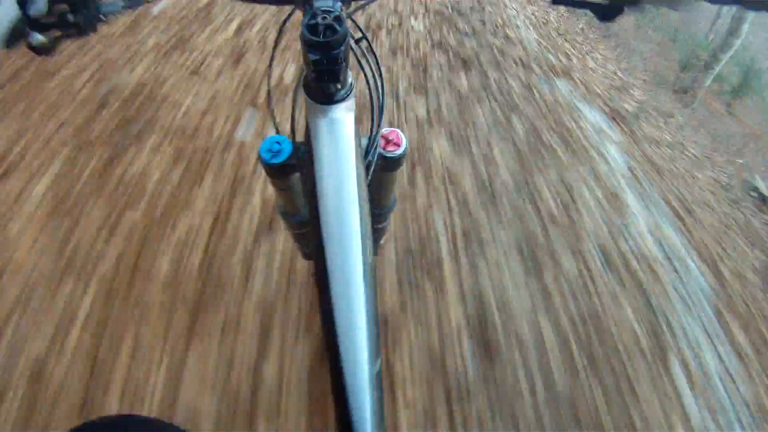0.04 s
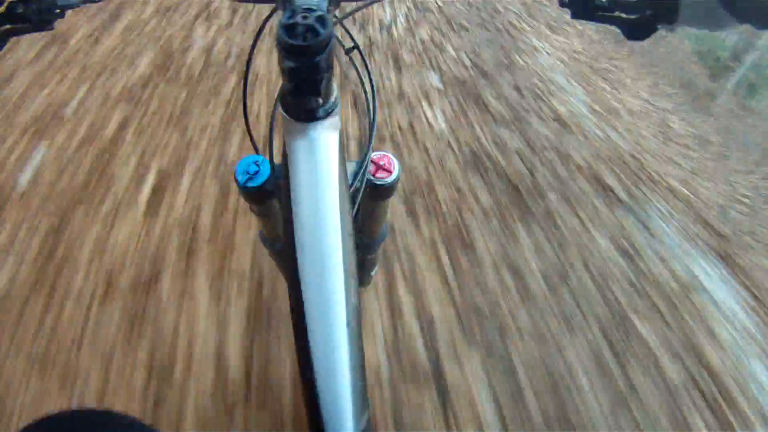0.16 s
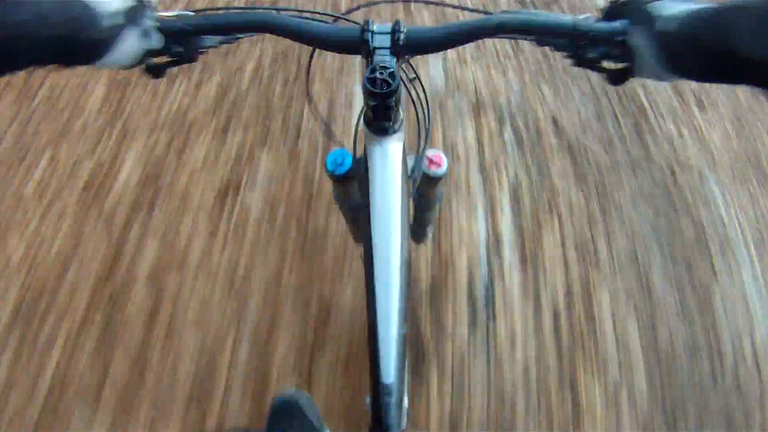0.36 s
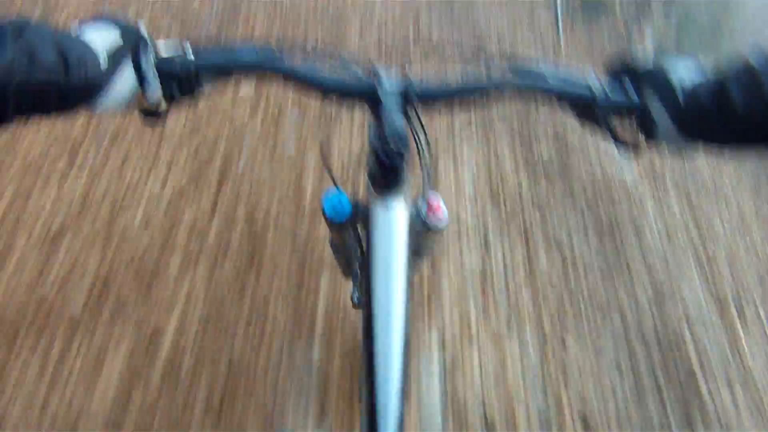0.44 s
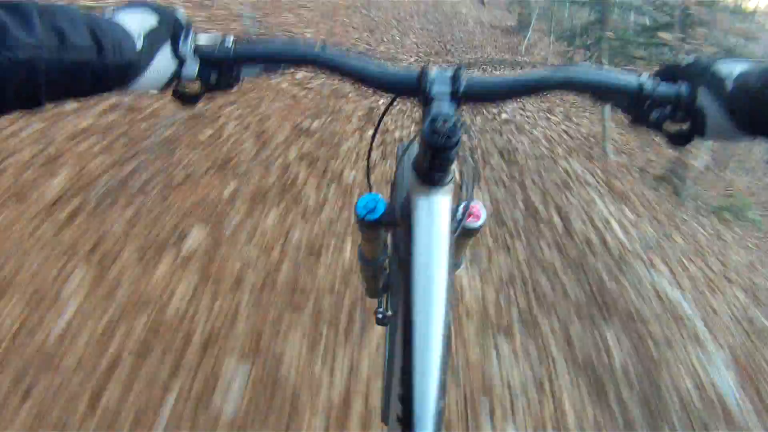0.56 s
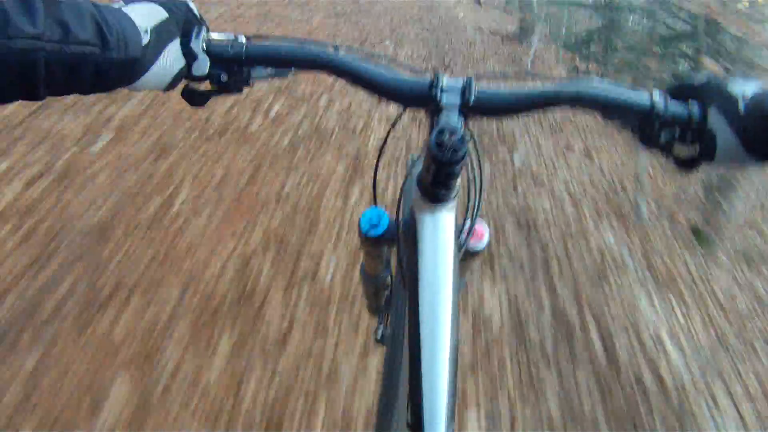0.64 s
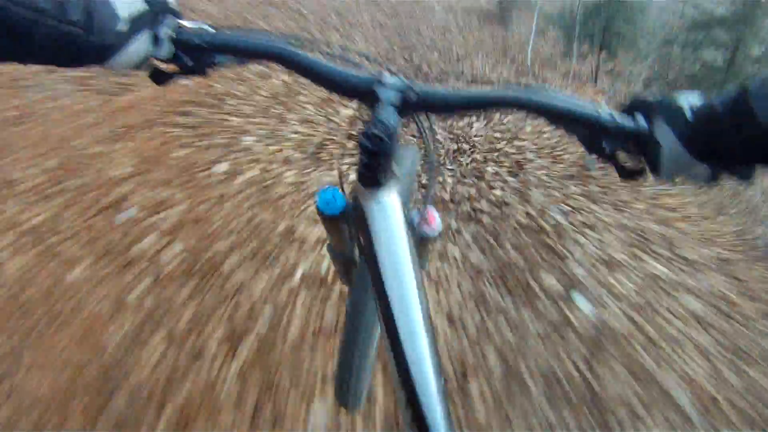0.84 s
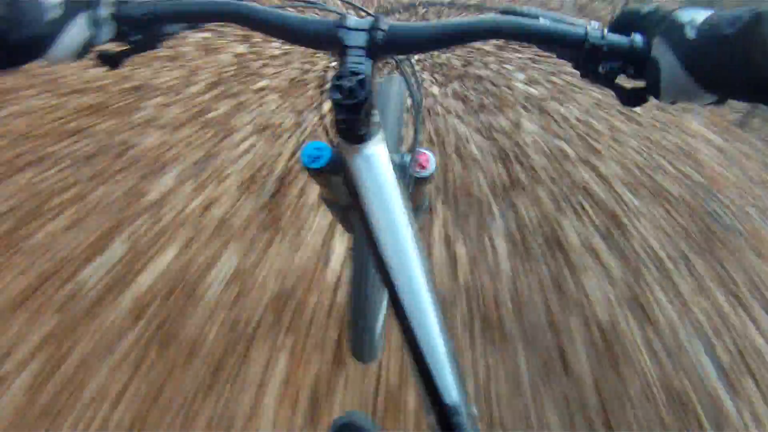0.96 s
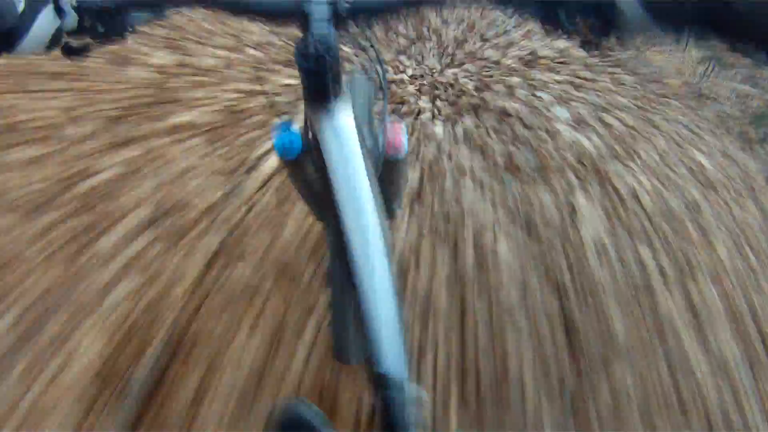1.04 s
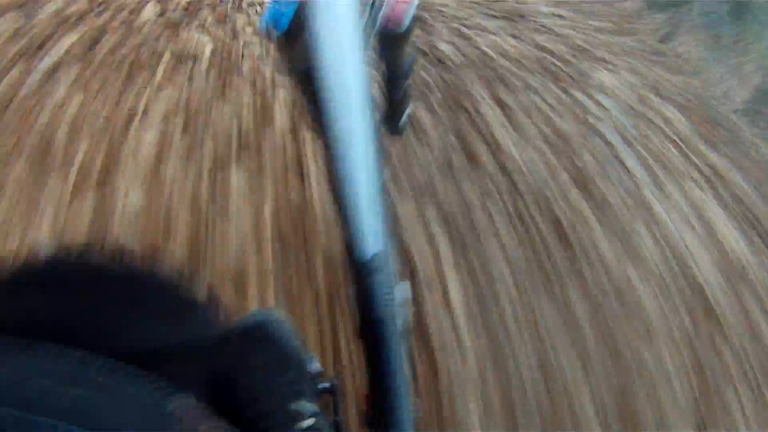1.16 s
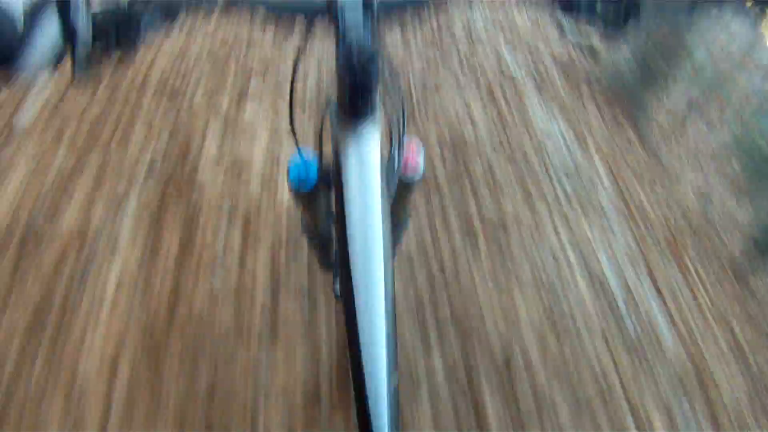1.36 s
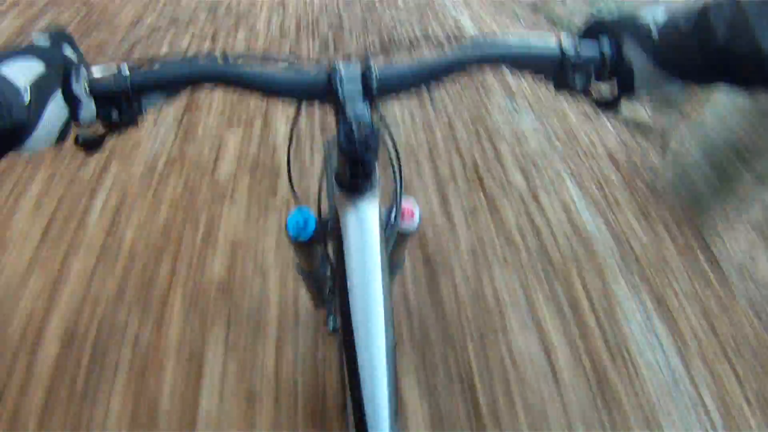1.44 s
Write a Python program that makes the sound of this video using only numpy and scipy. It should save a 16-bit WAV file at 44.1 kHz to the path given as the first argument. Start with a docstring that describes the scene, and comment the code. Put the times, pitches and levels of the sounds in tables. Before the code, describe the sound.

Mountain bike tyres rush through dry leaves, with wind buffeting and two hard clacks.

```python
"""Mountain bike tyres rush and crackle fast through dry leaves, go light for half a second and bite again.
Each snapping leaf is an impulse; together they merge into noise. Bumps shake the rider's camera and its
mount clacks hard twice. Air buffets the camera case, and the trail rumbles up through the frame.
All is heard from inside the case, whose hollow resonances colour the rush, hiss and clicks."""
import sys
import numpy as np
from scipy import signal
from scipy.fft import rfft, irfft
from scipy.io import wavfile
from scipy.ndimage import uniform_filter1d, minimum_filter1d

SR = 44100
rng = np.random.default_rng(int(sys.argv[2]) if len(sys.argv) > 2 else 0)


def digitize_waveform(pressure):
    """Quantize a signal to 16-bit integers and store it at the path in sys.argv[1].

    Rows of a 2-D input are taken as channels; values are limited to [-1, 1].
    """
    field = np.atleast_2d(pressure).T
    bounded = np.clip(field, -1, 1)
    quanta = np.round(bounded * 32767).astype(np.int16)
    wavfile.write(sys.argv[1], SR, quanta)


N = 66150
T = np.arange(N) / SR

# tyres pressing through the leaves: t/s, level/dB
TYRE_ENVELOPE = [(0, -32), (.2, -34), (.26, -32), (.35, -31), (.39, -37.5), (.52, -39), (.58, -54),
                 (.7, -74), (.82, -79), (.94, -60), (.975, -45), (1.0, -38.5), (1.03, -35), (1.1, -29.5),
                 (1.2, -32.5), (1.5, -33)]
# tyre rush before the case filters it: f/Hz, level/dB
RUSH_SPECTRUM = [(100, 18), (400, -10), (900, 3), (2200, -2), (4000, 6), (8000, 6), (15000, -18.5)]
# clumps of leaves crushed: t/s, level/dB, Gaussian half-width/s
LEAF_CLUMPS = [(0.281, -26.5, 0.0027), (0.455, -38.5, 0.013), (0.616, -47.5, 0.013), (0.664, -49.5, 0.011),
               (0.73, -48.5, 0.0062), (0.793, -53.5, 0.0047), (0.969, -37, 0.0092), (1.032, -26.5, 0.0053),
               (1.043, -29, 0.0017), (1.265, -29.5, 0.0051), (1.375, -29.5, 0.0039)]
# impacts of the mount: t/s, level/dB, relative ring level/dB, ring band's lower f/Hz, upper f/Hz
MOUNT_CLACKS = [(0.3619, 5.4, 4.9, 1650, 3240), (1.1289, 10.7, 21, 990, 2220)]
# bumps jolting the camera: t/s, level/dB, f/Hz
CAMERA_JOLTS = [(0.361, -3.5, 39), (0.426, -16, 60), (1.041, -15, 27), (1.084, -29, 55), (1.112, -20, 75.4),
                (1.224, -27, 38)]
# dull knocks of the bike: t/s, level/dB, f/Hz
BIKE_KNOCKS = [(0.385, -24.5, 1070), (0.424, -28.5, 1120), (1.167, -24, 1150)]
# twigs and grit striking the bike: t/s, level/dB
TWIG_TICKS = [(0.46, -34), (.469, -25), (0.499, -43), (.541, -24.5), (0.611, -40), (.653, -30), (.658, -28),
              (.664, -31), (.782, -32), (.790, -34.5), (.906, -31), (.929, -35)]
# air buffeting the case: t/s, level/dB
BUFFET_ENVELOPE = [(0, -36), (.18, -40.5), (.25, -30), (.35, -32), (.41, -31), (.49, -25), (.57, -38),
                   (.8, -50.5), (.96, -39), (1.04, -21), (1.12, -33.5), (1.25, -31.5), (1.38, -35.5),
                   (1.5, -50)]
# buffeting pressure: f/Hz, level/dB
BUFFET_SPECTRUM = [(10, -13), (18, 4.5), (30, 4), (50, -11), (75, -15), (150, -31.5), (400, -58)]
# air hiss before the case filters it: f/Hz, level/dB
HISS_SPECTRUM = [(200, 17.5), (600, 7.5), (1200, 11.5), (2200, -3.5), (4000, -7), (8000, -12.5), (11000, 2),
                 (15000, -5)]
# trail rumble in the frame: t/s, level/dB
RUMBLE_ENVELOPE = [(0, -49), (.3, -43), (.37, -31.5), (.45, -45), (.55, -45.5), (.8, -48), (.98, -42.5),
                   (1.1, -32.5), (1.2, -38.5), (1.5, -38)]
# frame vibration: f/Hz, level/dB
RUMBLE_SPECTRUM = [(40, 5.5), (80, 0.5), (125, 1.5), (250, -4.5), (400, -15), (700, -16.5), (1100, -17.5),
                   (2500, -38)]
# resonances (+) and dead bands (-) of the case: f/Hz, bandwidth/Hz, gain/dB
CASE_BANDS = [(1210, 126, 10.5), (1698, 100, -6.5), (2133, 268, 23), (3170, 240, 5), (3749, 219, 13),
              (5200, 290, 4.5), (5980, 1160, -12), (6800, 160, 4.5), (8296, 214, 13), (9810, 257, 14.5),
              (12280, 1960, -69), (12160, 5200, -27), (14210, 520, 12.5)]


def tyres():
    """Amplitude modulation: rush and crackle follow the tyre load; crushed clumps add short bursts."""
    rush = from_db(-4.5) * rms_one(case(coloured(RUSH_SPECTRUM))) * flutter(depth_db=2.13, rate_hz=125)
    clumps = sum(from_db(db) * np.exp(-.5 * ((T - t) / width) ** 2) for t, db, width in LEAF_CLUMPS)
    crunch = rms_one(crackle() + rms_one(case(rng.standard_normal(N))))
    return level(TYRE_ENVELOPE) * (rush + from_db(-7.5) * crackle()) + clumps * crunch


def crackle(snaps_per_s=2000, spread_db=3):
    """Shot noise: dry leaves snap at independent instants, in impulses of uneven size."""
    sizes = from_db(spread_db * np.minimum(rng.exponential(1, N), 5)) * rng.choice([-1, 1], N)
    snaps = rng.random(N) < snaps_per_s / SR
    return rms_one(case(sizes * snaps + 1e-18))


def mount(ring_lag_s=0.00068):
    """Impact excitation: each clack strikes the case, then the heavily damped plastic mount rings."""
    hits, rings = 0, 0
    for t, db, ring_db, low_hz, high_hz in MOUNT_CLACKS:
        hits += from_db(db) * contact(t, grit_db=-17.5)
        plastic = signal.butter(2, [low_hz, high_hz], "band", fs=SR, output="sos")
        rings += from_db(db + ring_db) * signal.sosfilt(plastic, contact(t + ring_lag_s, grit_db=-24))
    return radiate(case(hits) + rings, hz=357)


def contact(t, grit_db, decay_s=0.0018):
    """Hard contact is an impulse; friction on grit adds a brief tail of noise."""
    grit = from_db(grit_db) * rng.standard_normal(N) * (T > t)
    return click(t) + grit * np.exp(-np.abs(T - t) / decay_s)


def bumps(jolt_cycles=2.87):
    """Damped free vibration: bumps heave the camera for a few slow cycles and make the bike knock."""
    jolts = sum(from_db(db) * mode(click(t), hz, t60_s=jolt_cycles / hz) for t, db, hz in CAMERA_JOLTS)
    knocks = sum(from_db(db) * mode(click(t), hz, t60_s=0.034) for t, db, hz in BIKE_KNOCKS)
    return soften(knocks, hz=1490) - soften(jolts, hz=450)


def twigs():
    """Brief impacts have broad spectra: twigs and grit tick brightly while the tyres run light."""
    ticks = sum(from_db(db) * click(t) for t, db in TWIG_TICKS)
    return case(radiate(ticks, hz=2950))


def wind():
    """Turbulence: the passing air hisses steadily and buffets the case at low frequencies."""
    hiss = from_db(-50) * rms_one(case(coloured(HISS_SPECTRUM))) * flutter(depth_db=1, rate_hz=65)
    buffet = coloured(BUFFET_SPECTRUM)
    running_rms = np.sqrt(uniform_filter1d(buffet ** 2, int(0.043 * SR)) + 1e-9)
    return hiss + level(BUFFET_ENVELOPE) * buffet / running_rms  # the division evens out random swells


def rumble():
    """Structure-borne sound: rough ground shakes the frame."""
    return level(RUMBLE_ENVELOPE) * coloured(RUMBLE_SPECTRUM)


def case(x, smear_hz=1940):
    """Resonance and group delay: the case lifts or cuts each band and holds it back a little."""
    smear = np.tan(np.pi * smear_hz / SR)  # the lower, the longer the walls smear a click
    for hz, bandwidth, db in CASE_BANDS:
        width = np.tan(np.pi * bandwidth / SR)
        tuning = -2 * np.cos(2 * np.pi * hz / SR)
        peak = width * from_db(db)
        x = signal.lfilter([1 + peak, tuning, 1 - peak], [1 + width, tuning, 1 - width], x)
        x = signal.lfilter([1 - smear, tuning, 1 + smear], [1 + smear, tuning, 1 - smear], x)  # all-pass
    return x


def mode(x, hz, t60_s):
    """Damped oscillator: a unit impulse starts a sine of height 1 that falls 60 dB in t60_s."""
    decay = from_db(-60 / (t60_s * SR))
    step = 2 * np.pi * hz / SR
    return signal.lfilter([0, np.sin(step)], [1, -2 * decay * np.cos(step), decay * decay], x)


def soften(x, hz):
    """Compliance: a soft contact spreads a blow in time, acting as a low-pass."""
    return signal.lfilter(*signal.butter(1, hz, fs=SR), x)


def radiate(x, hz):
    """Radiation efficiency: small parts give off little bass, acting as a high-pass."""
    return signal.lfilter(*signal.butter(1, hz, "high", fs=SR), x)


def coloured(spectrum):
    """Spectral shaping: white noise weighted along log frequency, at unit rms."""
    hz, db = np.transpose(spectrum)
    bins_hz = np.maximum(np.arange(N // 2 + 1) * SR / N, 1)
    gain = from_db(np.interp(np.log(bins_hz), np.log(hz), db))
    return rms_one(irfft(rfft(rng.standard_normal(N)) * gain, N))


def flutter(depth_db, rate_hz):
    """Random modulation: a gain wandering by depth_db rms, mostly slower than rate_hz."""
    lowpass = signal.butter(2, rate_hz, fs=SR, output="sos")
    wander = signal.sosfilt(lowpass, rng.standard_normal(2 * N))[N:]
    return from_db(depth_db * rms_one(wander))


def click(t):
    """Unit impulse at time t."""
    return (np.arange(N) == int(t * SR)) + 1e-18


def level(envelope):
    """Gain over time, linear in decibels between points."""
    return from_db(np.interp(T, *np.transpose(envelope)))


def rms_one(x):
    """Normalisation to unit rms."""
    return x / np.sqrt(np.mean(x ** 2) + 1e-20)


def from_db(db):
    """Amplitude ratio of a level in decibels."""
    return 10 ** (np.asarray(db) / 20)


def scene():
    """Superposition: the sources add in the middle; faint separate draws of rumble and tyres differ slightly
    between left and right."""
    mid = tyres() + wind() + rumble() + mount() + bumps() + twigs()
    side = from_db(-38.5) * rumble() + from_db(-60) * tyres()
    return np.array([mid + side, mid - side])


def record(dry, limiter_s=0.0011, cutoff_hz=15250):
    """Peak limiting: a fast gain dip holds the clacks at full scale; a steep low-pass cuts the top."""
    span = 2 * int(limiter_s * SR / 2) + 3
    allowed_gain = 1 / np.maximum(np.abs(dry).max(axis=0), 1)
    gain = uniform_filter1d(minimum_filter1d(allowed_gain, span), span)
    lowpass = signal.ellip(10, .1, 70, cutoff_hz, fs=SR, output="sos")
    return signal.sosfilt(lowpass, gain * dry)


dry = scene()
out = record(dry)
digitize_waveform(out)
```